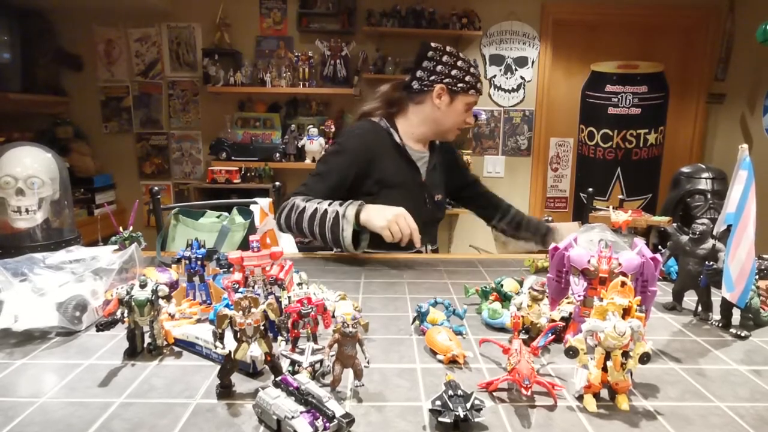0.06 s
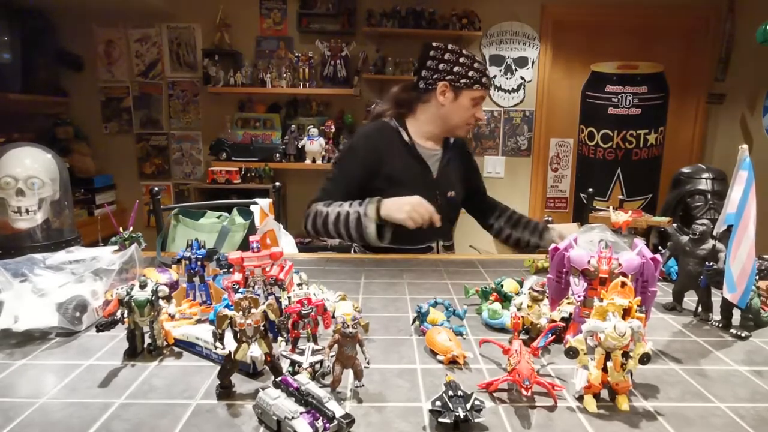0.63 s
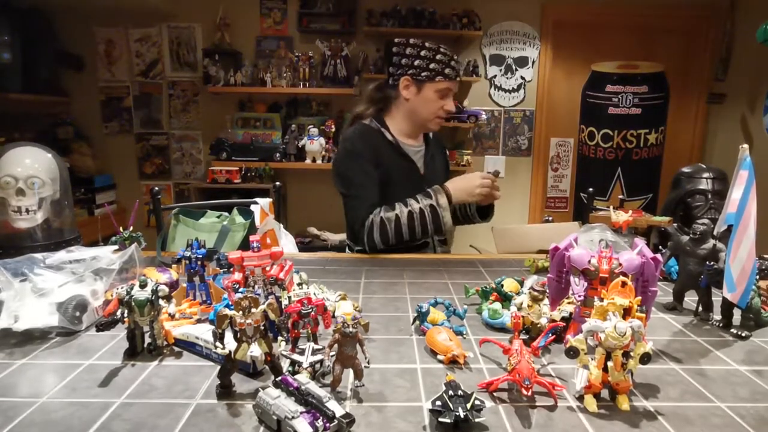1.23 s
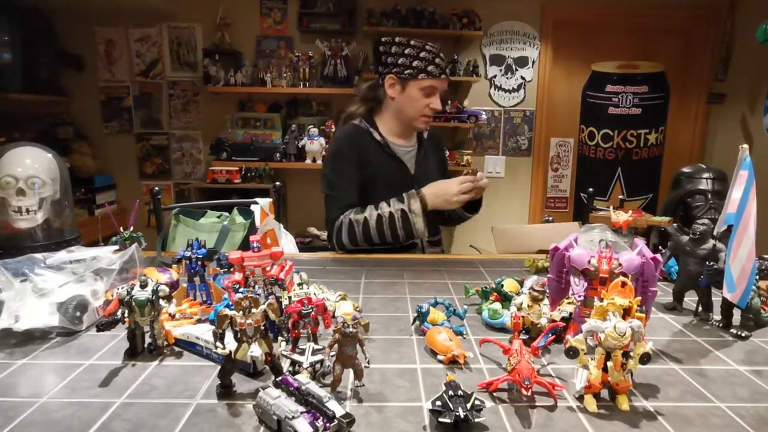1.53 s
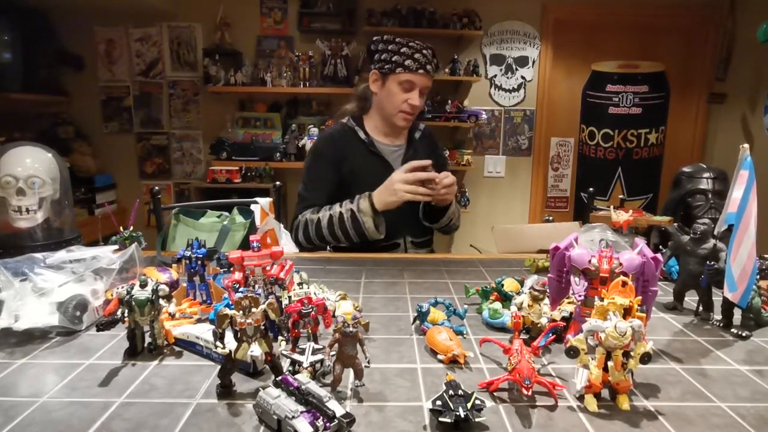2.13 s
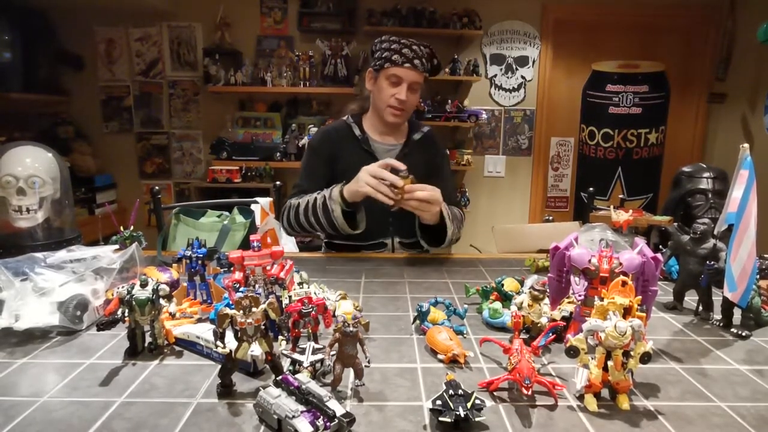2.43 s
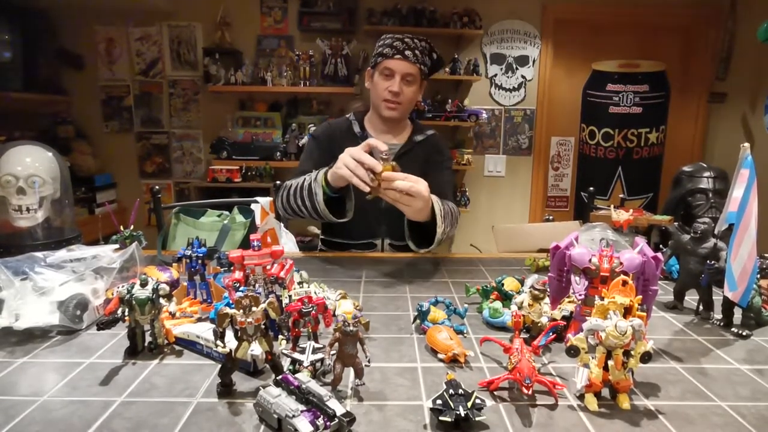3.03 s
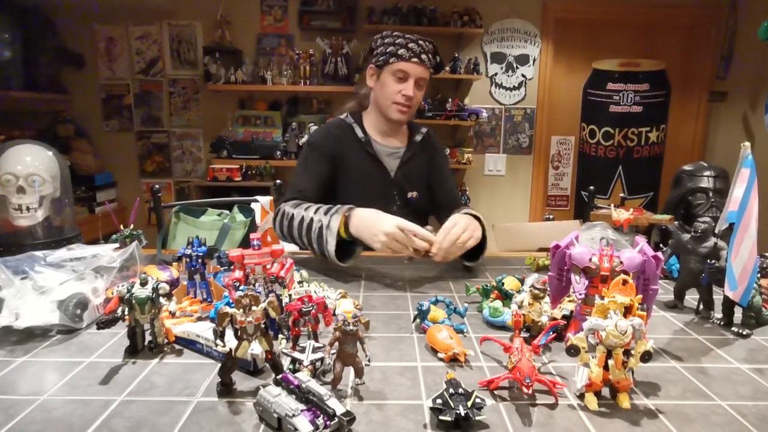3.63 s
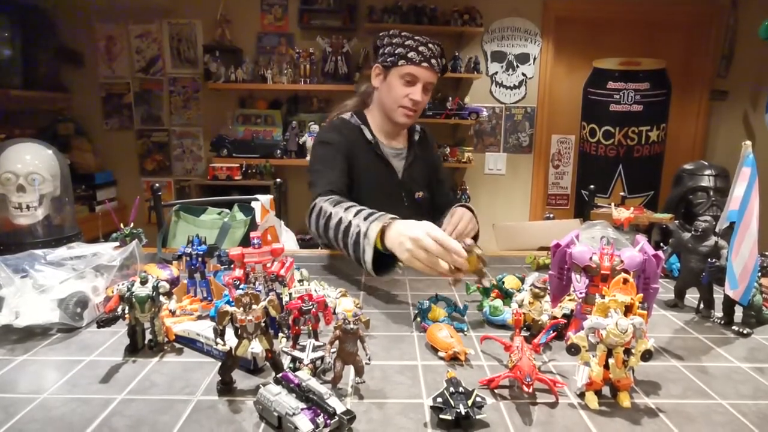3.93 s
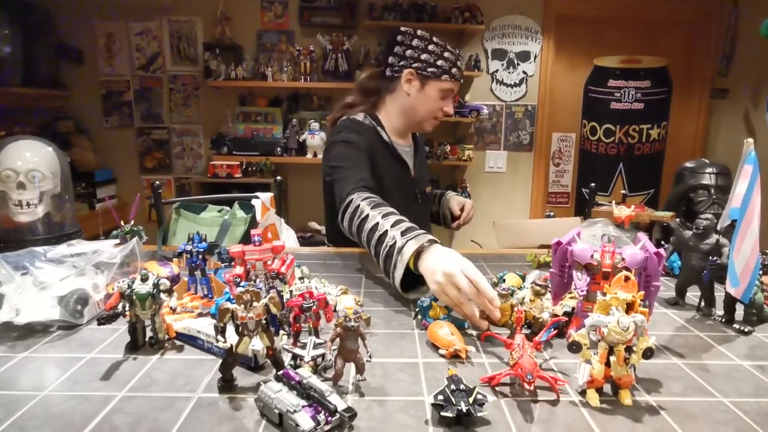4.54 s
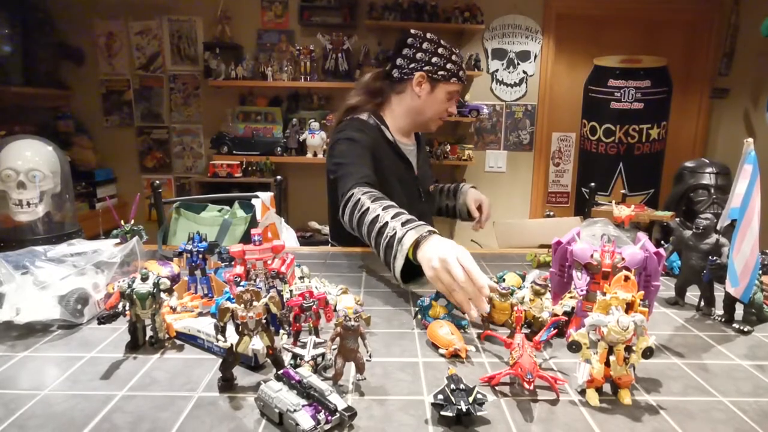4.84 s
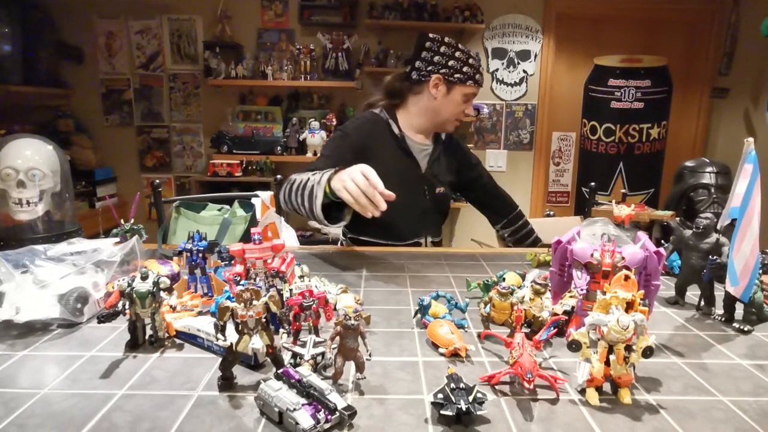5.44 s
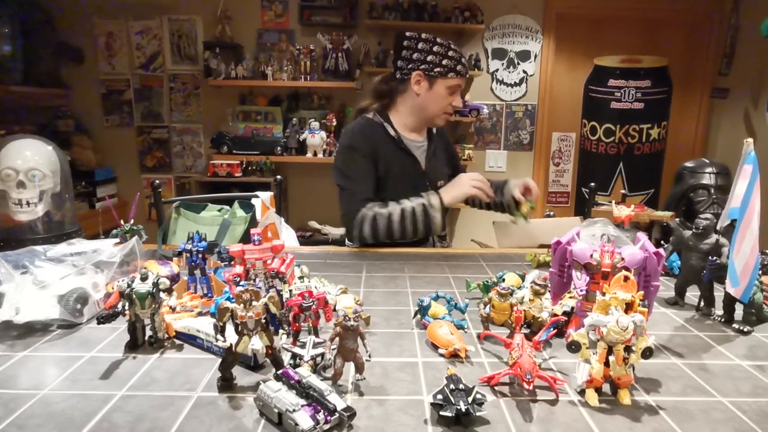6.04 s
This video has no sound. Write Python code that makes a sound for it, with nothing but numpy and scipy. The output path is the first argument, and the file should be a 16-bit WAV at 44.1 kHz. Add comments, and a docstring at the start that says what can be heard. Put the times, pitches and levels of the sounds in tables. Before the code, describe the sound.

Rummaging through plastic toys in a cardboard box, sharp clicks of a toy's joints, a clack on the tabletop, then more rummaging.

```python
"""Small plastic figures knock and scrape in a cardboard box, and each knock booms the table it stands against.
The table's frame takes a soft bump. One figure's stiff joints creak by stick-slip friction and snap over
their detents, sleeves brush the table's edge, and the figure is stood on its hard feet. Then the hand
rummages again and the box bumps down twice. All of it happens in a small room, to the right of a pair of
microphones on the table."""
import sys
import numpy as np
from scipy import signal
from scipy.fft import rfft, irfft, next_fast_len
from scipy.io import wavfile

SR = 44100
rng = np.random.default_rng(int(sys.argv[2]) if len(sys.argv) > 2 else 0)


def generate_wav(sig):
    """Save sig (samples, or channels by samples) to the path in sys.argv[1] as 16-bit PCM at SR."""
    pcm = np.round(np.clip(np.atleast_2d(sig).T, -1, 1) * 32767).astype(np.int16)
    wavfile.write(sys.argv[1], SR, pcm)


N = 276507
T = np.arange(SR // 2) / SR  # seconds since an impact


def amp(db):
    """Amplitude ratio of a level in decibels."""
    return 10 ** (np.asarray(db) / 20)


def unit(x):
    """Normalisation of a steady sound to rms 1."""
    return x / np.sqrt(np.mean(x ** 2) + 1e-20)


def unit_energy(x):
    """Normalisation of a transient to the energy of 10 ms at rms 1."""
    return x / np.sqrt(np.sum(x ** 2) / (SR / 100) + 1e-20)


def along(points, hz):
    """Interpolation of (Hz, value) points on a logarithmic frequency axis."""
    f, v = np.transpose(points)
    return np.interp(np.log(hz + 1), np.log(f + 1), v)


def filtered(x, response):
    """Linear filtering: the spectrum of x is multiplied by a frequency response."""
    n = x.shape[-1]
    m = next_fast_len(n + 4096)
    return irfft(rfft(x, m) * response(np.fft.rfftfreq(m, 1 / SR)), m)[..., :n]


def coloured(x, spectrum):
    """Spectral shaping by a curve of (Hz, dB) points."""
    return filtered(x, lambda hz: amp(along(spectrum, hz)))


def resonance(x, hz, q):
    """A damped oscillator driven by x passes a band of width hz / q."""
    return filtered(x, lambda f: 1j * f * hz / q / (hz * hz - f * f + 1j * f * hz / q))


def burst(spectrum, t60):
    """Exponential decay of coloured noise, by 60 dB in t60 seconds."""
    return unit_energy(coloured(rng.standard_normal(len(T)), spectrum) * amp(-60 * T / t60))


def ring(modes, detune):
    """Free vibration: a sum of damped modes whose strength, sign and pitch vary from blow to blow."""
    hz, db, t60 = np.transpose(modes)[:, :, None]
    strength, shift, side = rng.standard_normal((3, len(modes), 1))
    envelopes = np.sign(side) * amp(db + 2 * strength - 60 * T / t60)
    return unit_energy((envelopes * np.sin(2 * np.pi * hz * (1 + detune * shift) * T)).sum(0))


def friction(spectrum, slips_per_s, smooth):
    """Stick-slip friction: random impulses of uneven size on a smooth rubbing noise, at rms 1."""
    slips = (rng.random(N) < slips_per_s / SR) * rng.standard_normal(N)
    return unit(coloured(unit(slips) + smooth * rng.standard_normal(N), spectrum))


def stroke(middle, length):
    """A raised-cosine swell of pressure, whose base spans 1.38 times its nominal length."""
    return np.cos(np.pi / 2 * np.clip((np.arange(N) / SR - middle) / (0.69 * length), -1, 1)) ** 2


def strokes(rows):
    """The summed envelope of several strokes, each at its own level."""
    return sum(amp(db) * stroke(middle, length) for middle, length, db in rows)


def held(start, end, attack, release):
    """An envelope with a linear rise from start and an exponential decay from end."""
    t = np.arange(N) / SR
    return np.clip((t - start) / attack, 0, 1) * np.exp(-np.maximum(t - end, 0) / release)


def add(track, start, x):
    """Superposition of x on the track, from start in seconds."""
    part = track[:, max(round(start * SR), 0):][:, :x.shape[-1]]
    part += x[..., :part.shape[1]]


# Shadow on the direct path to the left microphone. Each row: frequency in Hz, gain in dB.
DIRECT_SHADOW = [(300, -1.5), (1200, -2.5), (3000, -8), (8000, -12), (14000, 4)]
LEFT_LAG_S = 0.000083
def direct(x):
    """Path difference and acoustic shadow: sound from the right arrives later and coloured on the left."""
    left = filtered(x, lambda hz: amp(along(DIRECT_SHADOW, hz)) * np.exp(-2j * np.pi * hz * LEFT_LAG_S))
    return np.array([left, x])


# Reverberation of the room. Each row: frequency in Hz, 60 dB decay time in seconds.
ROOM_DECAY = [(150, 0.49), (800, 0.13), (2500, 0.22), (6000, 0.17), (14000, 0.22)]
def in_room(x, wet_db):
    """Reverberation: each microphone receives the direct sound and its own diffuse tail."""
    hz, t, noise = signal.stft(rng.standard_normal((2, SR // 3)), SR, nperseg=256)
    decay = amp(-60 * t / along(ROOM_DECAY, hz)[:, None])
    tail = signal.istft(noise * decay * (1 - np.exp(-t / 0.0006)), SR, nperseg=256)[1]
    diffuse = signal.fftconvolve(x[None], tail / np.linalg.norm(tail[0]), axes=1)[:, :len(x)]
    return direct(x) + amp(wet_db) * diffuse


# Spectrum of the room's air. Each row: frequency in Hz, relative density in dB.
AIR_SPECTRUM = [(20, 0), (60, -8), (110, -13.5), (300, -19.5), (700, -24.5), (1000, -29), (1400, -35.5),
                (2300, -33.5), (3400, -39), (4900, -40), (6200, -47.5), (9700, -55), (12000, -48.5),
                (15500, -55)]
# Likeness of its two channels. Each row: frequency in Hz, coherence from 0 to 1.
AIR_COHERENCE = [(60, 0.012), (180, 0.13), (550, 0.17), (1650, 0.023), (4970, 0.026), (15000, 0.99)]
# Its balance. Each row: frequency in Hz, left minus right level in dB.
AIR_BALANCE = [(60, 0), (180, -0.5), (550, 4.0), (1650, 2.0), (4970, -1), (15000, 0.5)]
def room_tone():
    """Partial coherence: the steady air is one noise common to both sides and one in opposite phase."""
    def mid_side_gains(hz):
        angle = np.arccos(np.clip(along(AIR_COHERENCE, hz), 0, 1)) / 2
        return amp(along(AIR_SPECTRUM, hz)) * [np.cos(angle), np.sin(angle)]
    mid, side = filtered(rng.standard_normal((2, N)), mid_side_gains)
    pair = np.array([mid + side, mid - side])
    return amp(-62) * unit(filtered(pair, lambda hz: amp(np.outer([.5, -.5], along(AIR_BALANCE, hz)))))


# The tabletop's deep modes, with a close pair that beats, and its higher modes.
# Each row: frequency in Hz, relative level in dB, 60 dB decay time in seconds.
TABLE_LOW_MODES = [(95, -10, 0.34), (186, -12, 0.019), (241.45, 11.5, 0.23), (261.7, 10.5, 0.23)]
TABLE_HIGH_MODES = [(279.4, 2, 0.083), (380.2, -0.5, 0.17), (490.6, -7.5, 0.11), (581, -8, 0.21)]
def tabletop(modes):
    """Superposed modes of alternating sign: the boom swells after each blow, falls away and swells again."""
    board = sum((-1) ** k * amp(db - 60 * T / t60) * np.sin(2 * np.pi * hz * T)
                for k, (hz, db, t60) in enumerate(modes))
    # a cushioned contact drives no treble, and the board radiates little bass
    return direct(unit_energy(resonance(board, 235, q=0.45)))


# Modes of the cardboard walls and of the figures' small limbs.
# Each row: frequency in Hz, relative level in dB, 60 dB decay time in seconds.
WALL_MODES = [(430.4, 1.5, 0.047), (528, -3.5, 0.12), (610, -11, 0.11), (730, -1.5, 0.054),
              (755, -17, 0.13), (879, 1, 0.039), (984, -2, 0.06), (1194, -0.5, 0.017), (1317, 1.5, 0.023),
              (2276, -11.5, 0.12)]
LIMB_MODES = [(2384, -7.5, 0.069), (2885, 9, 0.0083), (3630, -11.5, 0.062), (3620, -5, 0.028),
              (4420, -14.5, 0.044), (5034, -6.5, 0.04), (6340, -21, 0.088), (8600, -4, 0.034)]
# Contact noise of cardboard and of plastic. Each row: frequency in Hz, relative density in dB.
CARD_SPECTRUM = [(120, -1), (300, 11.5), (550, 1.5), (950, -2), (1150, -14), (1800, -18.5), (3000, -56),
                 (6000, -58)]
PLASTIC_SPECTRUM = [(900, 2.5), (2200, 7.5), (3000, 4), (4800, 5), (6000, 0), (8000, 9), (8900, -7),
                    (9800, -10.5), (12000, -7.5), (15500, -37)]
# Knocks in the box. Each row: start in seconds, relative levels of table boom and cardboard in dB,
# cardboard pitch in Hz, relative level of the plastic tick in dB.
BOX_KNOCKS = [ (0.402, -35.5, -52.5, 610, -67), (0.455, -39, -49.5, 485, -64), (0.482, -38, -40, 516, -62),
              (0.5302, -42, -49.5, 994, -65), (0.601, -49, -57, 800, -66), (0.641, -44.5, -48.5, 478, -67),
              (0.699, -51, -50.5, 558, -70), (0.731, -46, -53.5, 808, -72), (0.868, -36, -40, 654, -58),
              (0.9092, -33, -44, 543, -60), (0.964, -43, -53.5, 640, -61.5),
              (1.033, -58, -50.5, 752, -59.5), (5.396, -69, -63, 711, -77.5),
              (5.554, -38.5, -46.5, 661, -78), (5.624, -43.5, -43, 560, -63), (5.671, -48, -49.5, 589, -71),
              (5.764, -40, -47.5, 509, -71), (5.902, -40, -42.5, 896, -63.5),
              (5.952, -40.5, -37.5, 949, -60.5), (6.0711, -17, -34.5, 546, -56.5),
              (6.164, -21.5, -37.5, 723, -49)]
def box_knocks():
    """Impact excitation: a knock booms the table, rings one wall most and rattles the figures inside."""
    out = np.zeros((2, N))
    boom, board = tabletop(TABLE_LOW_MODES), tabletop(TABLE_HIGH_MODES)
    give = 1 - np.exp(-T / 0.001)  # cardboard yields before it pushes back
    for start, boom_db, card_db, card_hz, tick_db in BOX_KNOCKS:
        board_db = boom_db - 1.5 - 10 * np.log2(card_hz / 509)  # lower knocks drive these modes harder
        wall = ring(WALL_MODES, detune=0.0323) + amp(-2.5) * burst(CARD_SPECTRUM, t60=0.11)
        card = unit_energy(resonance(wall, card_hz, q=2.3) + 0.13 * wall)
        tick = unit_energy(burst(PLASTIC_SPECTRUM, t60=.06) + amp(-1) * ring(LIMB_MODES, detune=.04))
        add(out, start, amp(boom_db + 1.5) * boom + amp(board_db) * board)
        add(out, start, in_room(give * (amp(card_db) * card + amp(tick_db + 3.5) * tick), wet_db=1.5))
    return out


# The hand rummages. Each row: start and end in seconds, relative rasp, hiss and shudder levels in dB.
HAND_RUMMAGES = [(0.401, 1.043, -57.5, -65.5, -53), (5.55, 6.21, -57, -65.5, -57)]
# A figure is dragged along a wall.
# Each row: middle and nominal length in seconds, relative rasp, hiss and shudder levels in dB.
WALL_SCRAPES = [(0.498, 0.15, -50, -74, -47), (0.884, 0.051, -40.5, -53, -45),
                (0.993, 0.047, -45.5, -52.5, -46), (5.46, 0.26, -71, -73.5, -85),
                (5.68, 0.069, -64, -59.5, -65), (5.774, 0.077, -53, -58.5, -63),
                (5.978, .05, -54, -53, -57), (6.155, 0.14, -39, -52, -45)]
# Sliding plastic squeaks. Each row: middle and nominal length in seconds, level in dB.
PLASTIC_SQUEAKS = [(0.731, 0.07, -62), (5.576, 0.041, -60.5), (5.679, 0.074, -60), (5.791, 0.088, -65)]
GRAB_S, LET_GO_S, SLIDE_S, SQUEAK_HZ = 0.0029, 0.02, 0.021, 8850
def box_drags():
    """Sliding friction on cardboard: a coarse rasp, a fine hiss, thin squeaks and a low shudder."""
    motions = [(held(start, end, GRAB_S, LET_GO_S), levels) for start, end, *levels in HAND_RUMMAGES]
    motions += [(stroke(middle, length), levels) for middle, length, *levels in WALL_SCRAPES]
    # each knocked figure slides to rest
    motions += [(held(start, start, GRAB_S, SLIDE_S), (card_db - 6.5, tick_db - 7, card_db - 7))
                for start, _, card_db, _, tick_db in BOX_KNOCKS]
    envelopes, levels = map(np.array, zip(*motions))
    rasp, hiss, shudder = np.sqrt(amp(levels).T ** 2 @ envelopes ** 2)  # incoherent sounds add in power
    rasp *= amp(-2) * friction(CARD_SPECTRUM, slips_per_s=560, smooth=1.0)
    hiss *= amp(-5) * friction(PLASTIC_SPECTRUM, slips_per_s=310, smooth=1.0)
    squeaks = strokes(PLASTIC_SQUEAKS) * unit(resonance(rng.standard_normal(N), SQUEAK_HZ, q=55))
    shudder_spectrum = [(45, -33), (90, 3.5), (125, -11.5), (165, -0.5), (230, -5.5), (600, -52.0)]
    shudder *= amp(-3) * friction(shudder_spectrum, slips_per_s=240, smooth=0.24)
    return in_room(rasp + hiss + squeaks, wet_db=-6.5) + direct(shudder)


# The table's lowest mode.
# One row: level in dB, frequency in Hz, 60 dB decay time before the fade in seconds.
FRAME_MODE = (-38, 47.5, 1)
BUMP_START_S = 1.122
def frame_bump():
    """Damped oscillation: a soft bump sways the whole table, with a dull puff of contact."""
    out = np.zeros((2, N))
    db, hz, t60 = FRAME_MODE
    sway = amp(-60 * T / t60) * (1 - np.exp(-T / 0.02)) * np.sin(2 * np.pi * hz * T)
    spectrum = [(30, -11), (80, 4.0), (160, -10), (350, -18.5), (700, -31), (1500, -36.0), (4000, -50.5)]
    puff = burst(spectrum, t60=0.57) * (1 - np.exp(-T / 0.0013))
    fade = 1 - (T / T[-1]) ** 2  # the low sway fades out within half a second
    add(out, BUMP_START_S, amp(db) * fade * (sway + amp(-4.5) * puff))
    return out


# Plastic rubbing on plastic. Each row: frequency in Hz, relative density in dB.
CREAK_SPECTRUM = [(900, -13), (1700, 0), (2600, -7), (3250, 5), (3700, -9), (5200, 0), (6100, -3.5),
                  (7300, 1.5), (8100, 5), (9800, -13), (15000, -19)]
# Fingers change their grip. Each row: middle and nominal length in seconds, relative level in dB.
FINGER_RUBS = [(2.18, 0.052, -68), (3.3, .04, -57.5), (3.805, 0.47, -83)]
FIRST_TURN_S, LOOSENING_DB_PER_S = 2.4, 9.5
def creaks():
    """Stick-slip friction: fingers rub the figure, and a joint creaks before and after each snap."""
    pressure = strokes(FINGER_RUBS)
    for snap_s, *_, creak_db in JOINT_SNAPS:
        wind_up = stroke(snap_s - 0.023, length=0.036)
        follow_db = 1.5 - LOOSENING_DB_PER_S * (snap_s - FIRST_TURN_S)  # a worked joint loosens
        follow = amp(follow_db) * stroke(snap_s + 0.072, length=0.068)
        pressure = np.maximum(pressure, amp(creak_db) * (wind_up + follow))
    rub = friction(CREAK_SPECTRUM, slips_per_s=1700, smooth=0.84)
    return in_room(amp(-5) * pressure * rub, wet_db=1.5)


# The figure's hard shell. Each row: frequency in Hz, relative level in dB, 60 dB decay time in seconds.
SHELL_MODES = [(4370, -4, .03), (4655, -3, .045), (4940, -2, .045), (5350, -1, .06), (6990, -5, .02),
               (7950, 2, .03)]
# A detent's crack, and the hollow of the figure between cupped hands.
# Each row: frequency in Hz, relative density in dB.
CRACK_SPECTRUM = [(300, -35), (650, -2.5), (1500, -3.5), (3000, -1.5), (5000, 11), (6200, 1.5), (8000, 11),
                  (10000, -6.5), (14000, -8.5), (16000, -29)]
HOLLOW_SPECTRUM = [(500, -23), (1100, -2), (1500, 4.5), (2300, 2.5), (3500, 6.5), (7000, -38)]
# Joints snap over their detents. Each row: start in seconds, relative levels of force and hollow in dB,
# hollow pitch in Hz, relative creak level in dB.
JOINT_SNAPS = [ (2.216, -63, -83, 2120, -77.5), (2.36, -46.5, -51.5, 1550, -62.5),
               (2.5993, -41, -51.5, 1640, -58.5), (2.824, -52.5, -55, 1070, -56),
               (2.829, -39.5, -52, 1580, -61.5), (2.89, -63, -59, 1670, -79), (3.034, -49, -60, 1260, -52),
               (3.0994, -59, -58, 1790, -76), (3.1335, -54, -51, 2070, -72),
               (3.234, -51.5, -54, 1530, -57.5), (3.3465, -59, -55.5, 2080, -57.5),
               (3.43, -45, -58, 1680, -68), (3.5724, -65.5, -59, 1600, -79),
               (3.6288, -70.5, -75, 1310, -72)]
HARD_SNAP_DB, SHELL_DB_PER_DB, REBOUND_S = -38.5, 3.8, 0.0023
def joint_snaps():
    """Impulse response: a detent strikes its seat twice, the hollow resonates, hard snaps ring the shell."""
    out = np.zeros((2, N))
    for start, force_db, hollow_db, hollow_hz, _ in JOINT_SNAPS:
        contact = burst(CRACK_SPECTRUM, t60=.03)
        limbs = amp(-12) * ring(LIMB_MODES, detune=.03) * amp(-60 * T / .04)
        rebound = np.interp(T - REBOUND_S, T, burst(CRACK_SPECTRUM, t60=0.027), left=0)
        snap = amp(force_db + 0.47) * (unit_energy(contact + limbs) + amp(-6) * rebound)
        shell_db = HARD_SNAP_DB + SHELL_DB_PER_DB * (force_db - HARD_SNAP_DB)
        shell = unit_energy(resonance(ring(SHELL_MODES, detune=.001), 5200, q=3))
        hollow = unit_energy(resonance(burst(HOLLOW_SPECTRUM, t60=0.034), hollow_hz, q=4.1))
        add(out, start, in_room(snap + amp(shell_db) * shell + amp(hollow_db) * hollow, wet_db=-5.5))
    return out


# Sleeves brush the table. Each row: middle and nominal length in seconds, relative level in dB.
SLEEVE_BRUSHES = [(2.49, .2, -67.5), (2.905, 0.33, -60.5), (3.674, 0.64, -65), (4.349, .1, -60.5),
                  (4.512, 0.2, -52), (4.786, 0.12, -70)]
def sleeves():
    """Friction of cloth on the table's edge gives a faint, dull rustle."""
    spectrum = [(120, -8), (230, -12.5), (310, 4), (420, -19.5), (700, -17.5), (2000, -22), (6000, -49)]
    return direct(amp(-4.5) * strokes(SLEEVE_BRUSHES) * friction(spectrum, slips_per_s=400, smooth=0.72))


# The table's surface. Each row: frequency in Hz, relative level in dB, 60 dB decay time in seconds.
SURFACE_MODES = [(525, -29, 0.038), (554, 2.5, 0.11), (609.5, 0.5, 0.11), (785, -19, 0.061),
                 (950, -24, 0.037), (1114, -15.5, 0.067), (1810, -6.5, 0.028), (2040, -13, 0.06)]
# The clack and the tick of hard feet. Each row: frequency in Hz, relative density in dB.
CLACK_SPECTRUM = [(200, -11.5), (430, 3.5), (570, -0.5), (720, -1), (1050, -6), (1400, -13), (2000, -17),
                  (3200, -20), (6000, -49)]
TICK_SPECTRUM = [(600, 9), (1500, 6), (3500, -3), (5000, 10), (6200, -6), (8000, 10.5), (10000, -11),
                 (12000, -4), (16000, -20)]
# The feet meet the table. Each row: start in seconds, relative levels of contact and clack in dB.
FOOT_CONTACTS = [(4.434, -56, -64), (4.46, -54, -71), (4.485, -68, -55), (4.5032, -43, -36.5),
                 (4.517, -57, -49), (4.685, -79, -64)]
def set_down():
    """Hard impact: the figure touches, shifts and lands, and a stronger contact gives a brighter tick."""
    out = np.zeros((2, N))
    boom = tabletop(TABLE_LOW_MODES) + amp(-5.5) * tabletop(TABLE_HIGH_MODES)
    for start, contact_db, clack_db in FOOT_CONTACTS:
        surface = ring(SURFACE_MODES, detune=0.003)
        clack = unit_energy(surface + amp(-2.5) * burst(CLACK_SPECTRUM, t60=0.14))
        treble_shelf = [(9000, 0), (12000, contact_db + 47)]
        tick = unit_energy(coloured(burst(TICK_SPECTRUM, t60=0.012), treble_shelf))
        add(out, start, amp(contact_db + 5) * boom)
        add(out, start, in_room(amp(clack_db) * clack, wet_db=-2))
        add(out, start, in_room(amp(contact_db) * tick, wet_db=-9))
    return out


# The left microphone hears the handling dully, with a deep notch. Each row: frequency in Hz, gain in dB.
LEFT_SHADE = [(150, -.3), (330, -.5), (600, -3), (1400, -3.5), (3000, -5.5), (5200, -10.5), (6800, -16),
              (8200, -20), (10000, -11), (14000, -9)]
def scene():
    """Superposition: all the handling, shaded on the left, adds to room tone from every side."""
    left, right = (box_knocks() + box_drags() + joint_snaps() + creaks()
                   + sleeves() + set_down() + frame_bump())
    return np.array([coloured(left, LEFT_SHADE), right]) + room_tone()


BAND_LIMIT_HZ = 15700
def record(dry):
    """Band limiting: an ideal low-pass filter removes the highest treble."""
    return filtered(dry, lambda hz: hz < BAND_LIMIT_HZ)


dry = scene()
out = record(dry)
generate_wav(out)
```